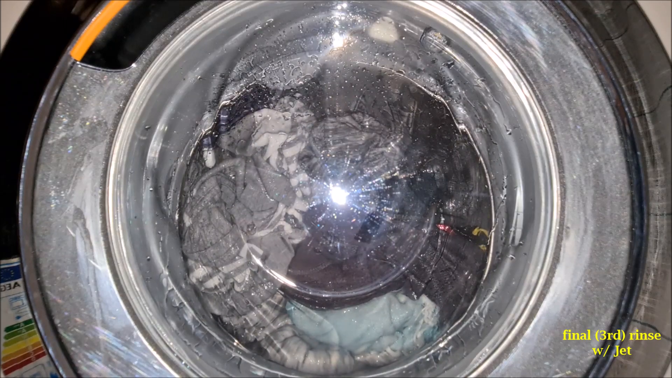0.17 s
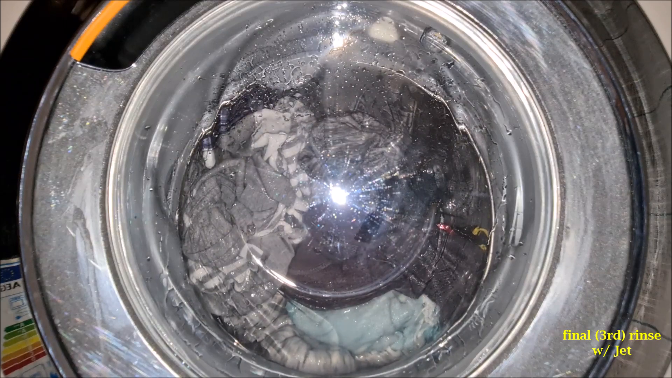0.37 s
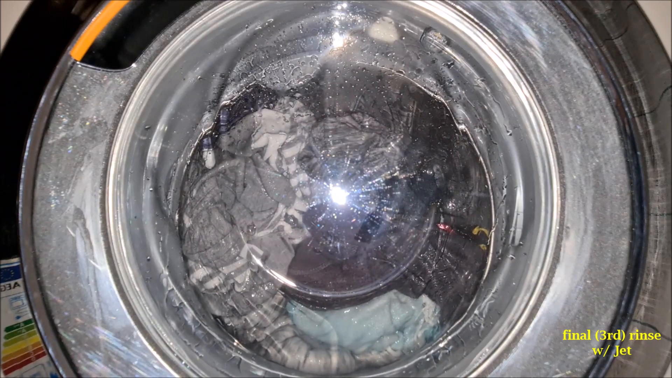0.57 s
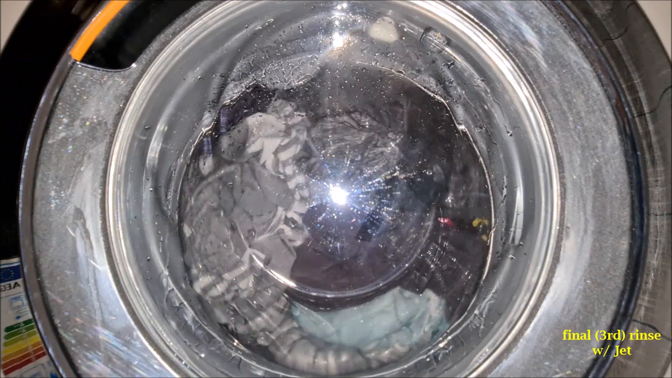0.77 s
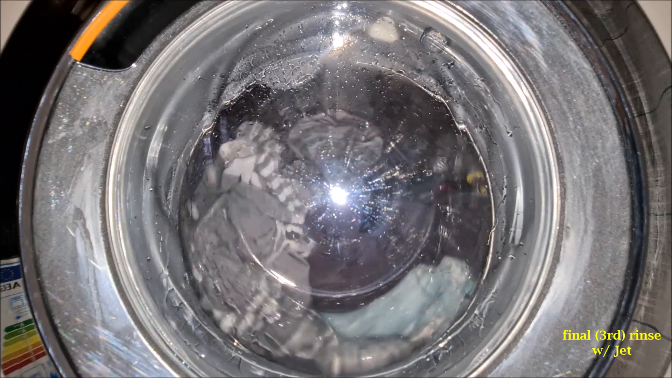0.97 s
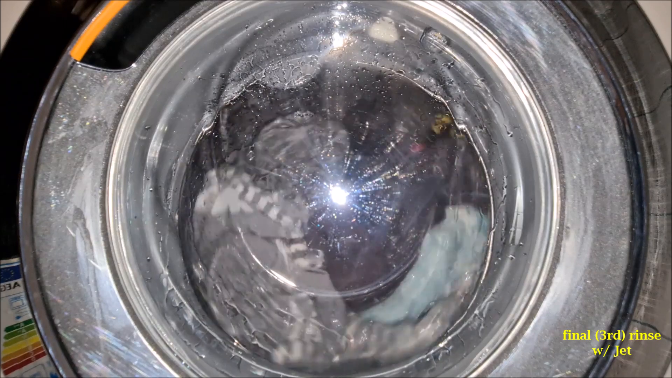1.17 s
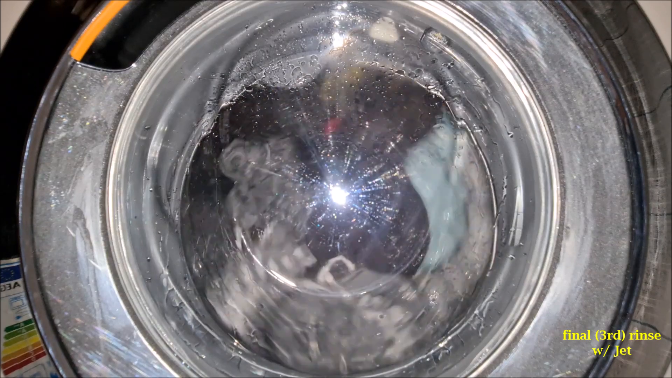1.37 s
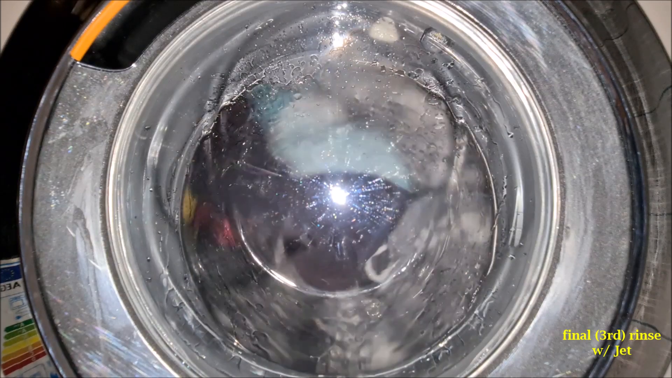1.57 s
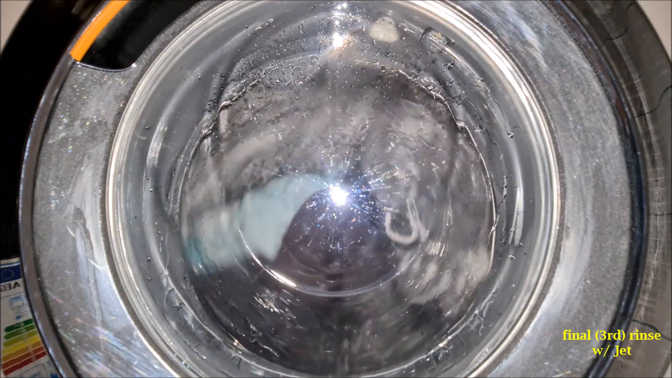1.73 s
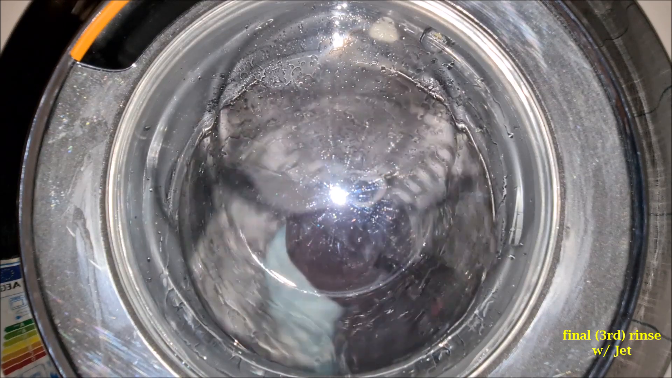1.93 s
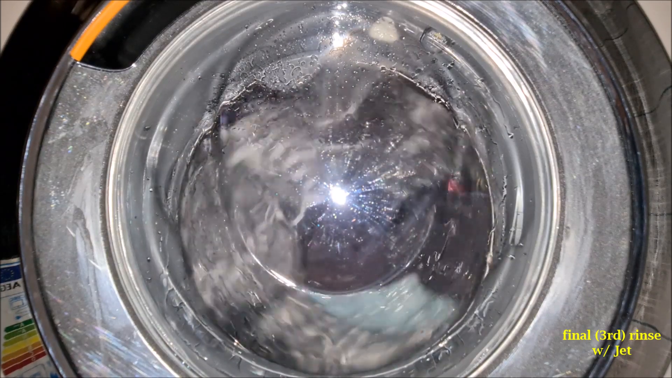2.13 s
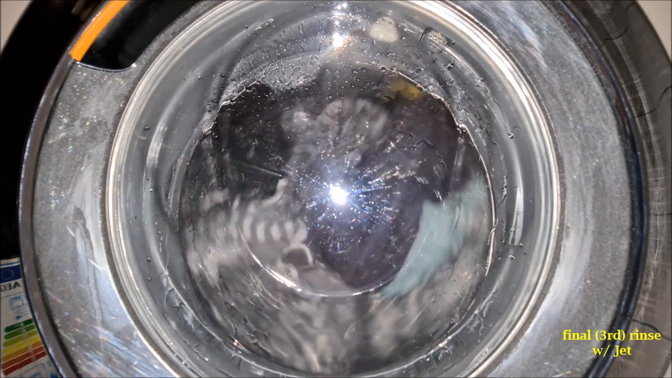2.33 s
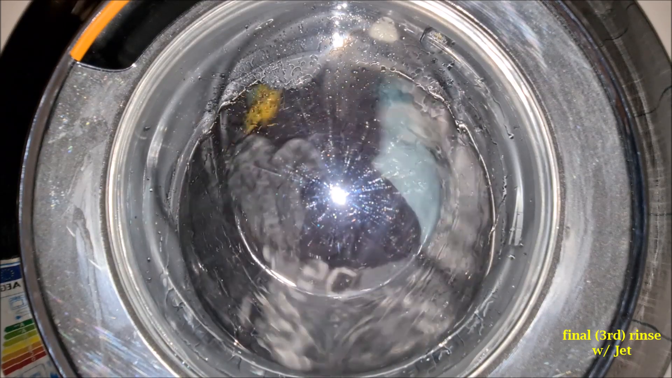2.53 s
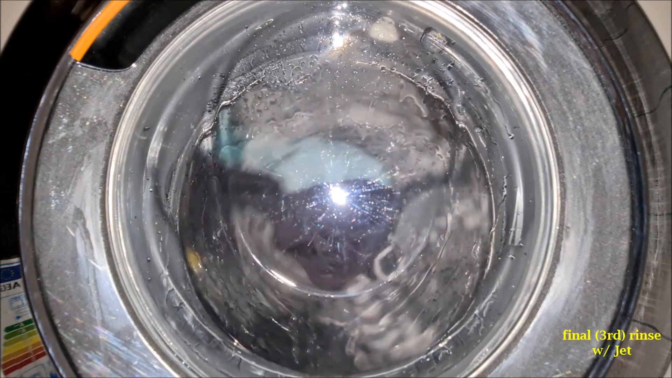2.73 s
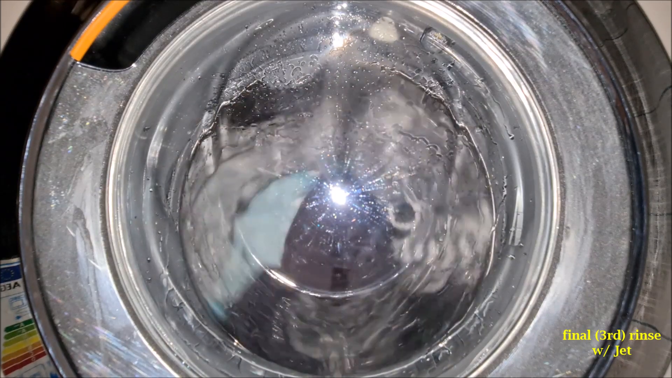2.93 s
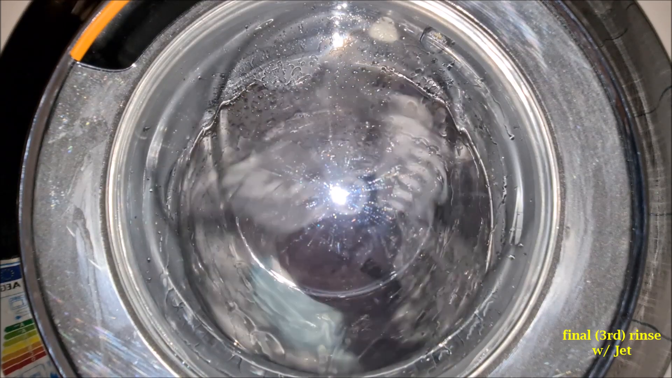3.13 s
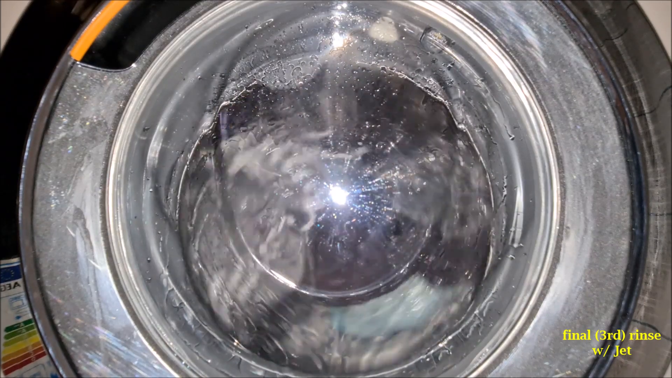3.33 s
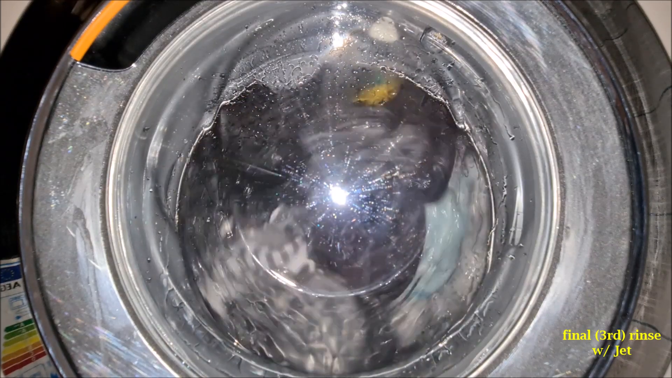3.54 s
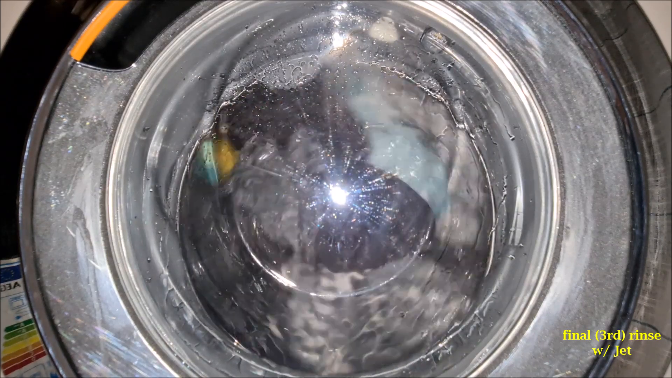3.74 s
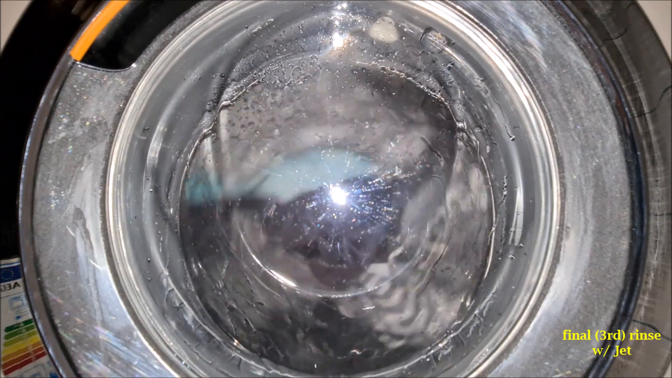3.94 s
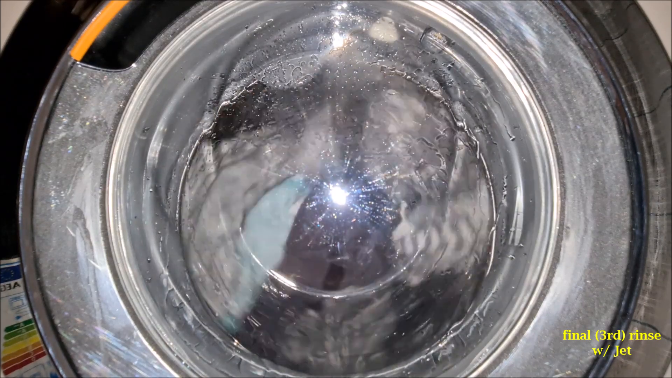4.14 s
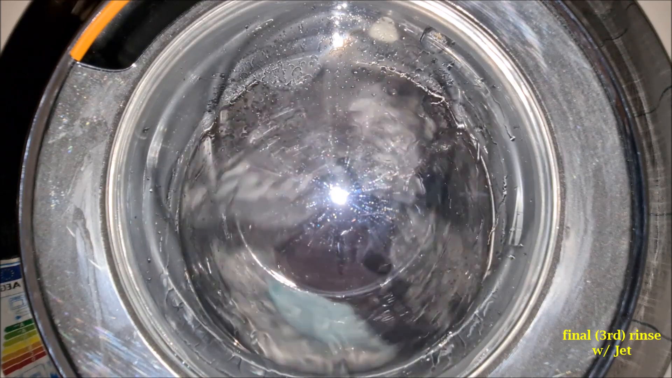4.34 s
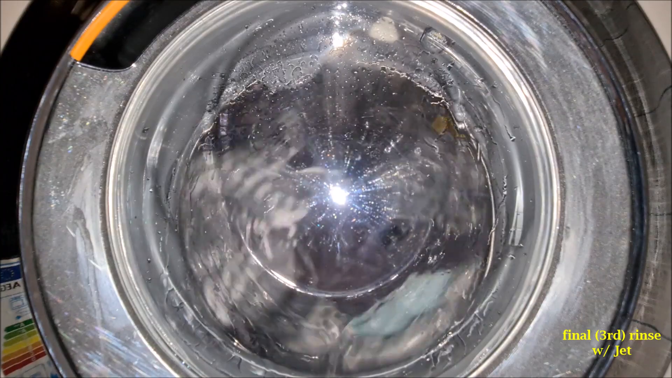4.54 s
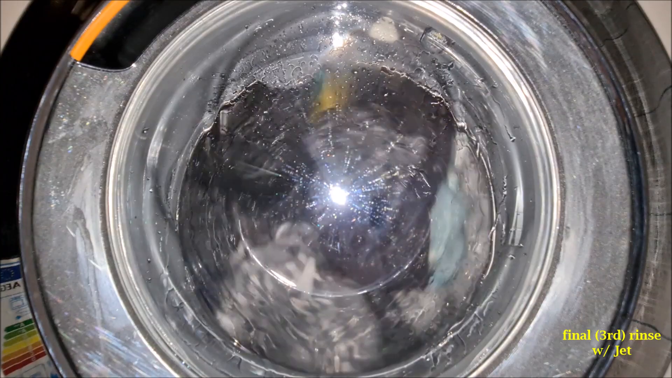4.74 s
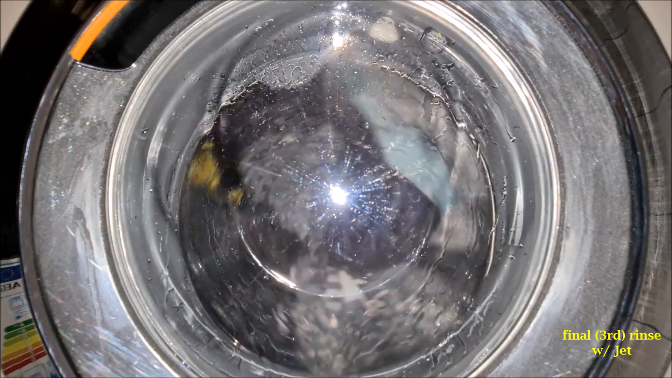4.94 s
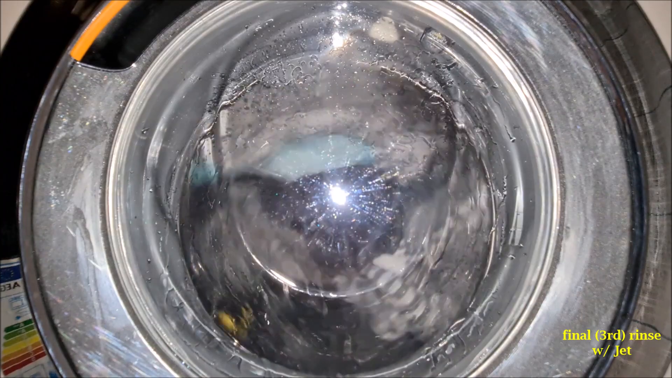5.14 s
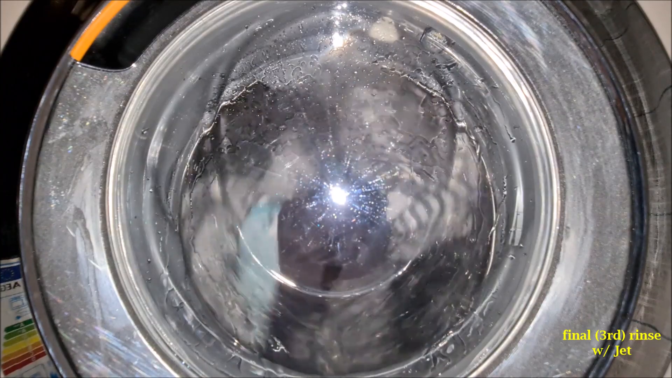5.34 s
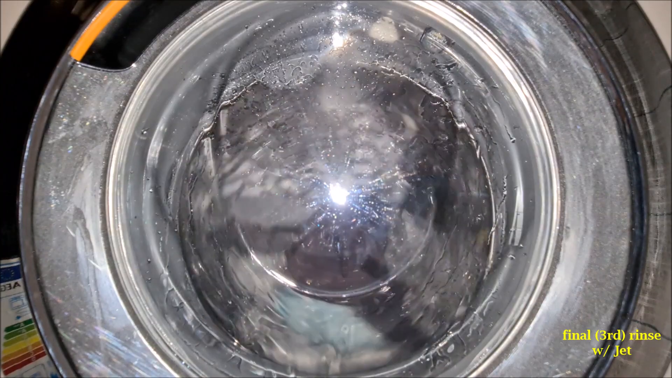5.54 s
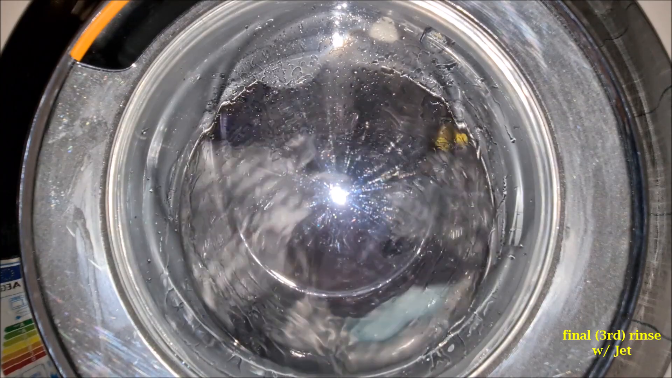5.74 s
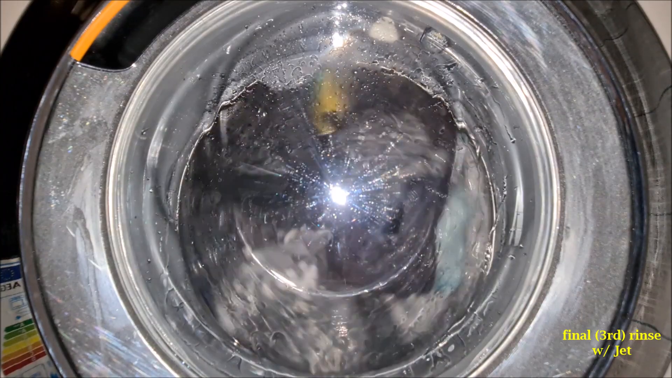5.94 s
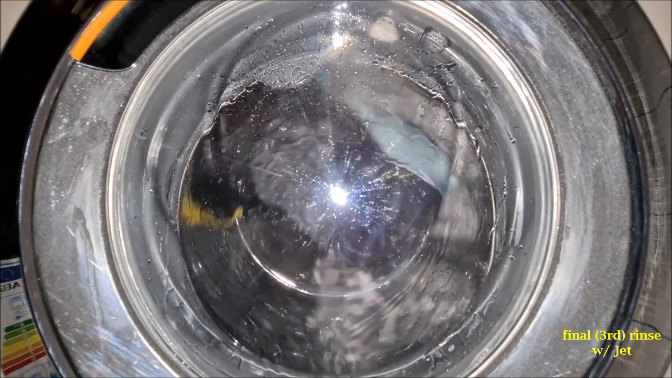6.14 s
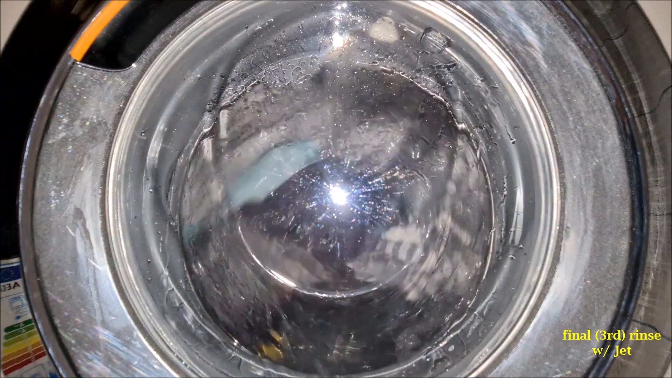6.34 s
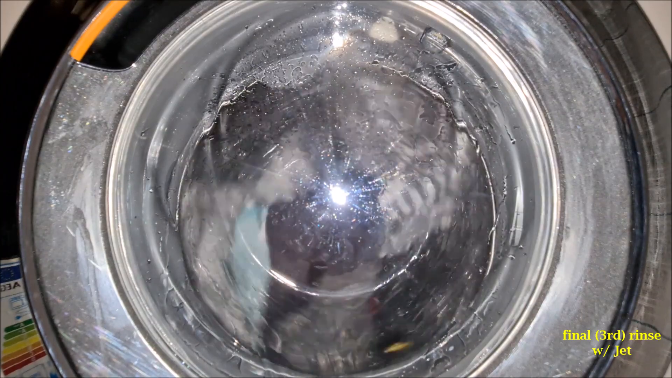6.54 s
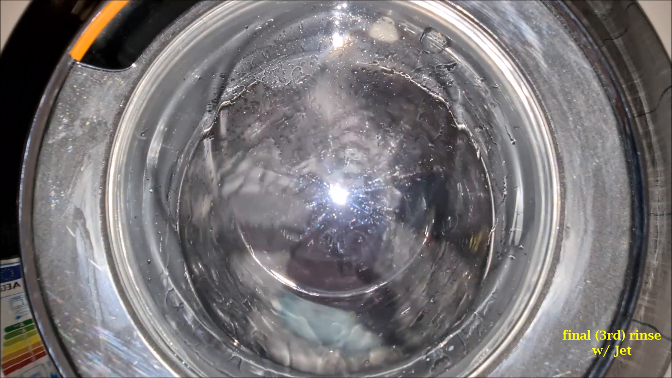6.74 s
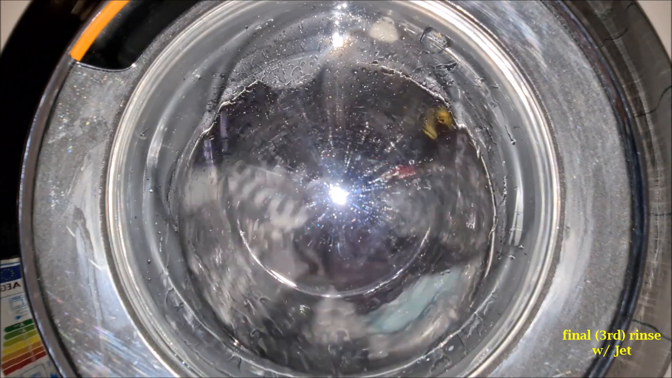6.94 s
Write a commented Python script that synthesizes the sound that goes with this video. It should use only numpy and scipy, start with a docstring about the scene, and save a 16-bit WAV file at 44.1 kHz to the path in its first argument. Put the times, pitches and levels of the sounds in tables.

```python
"""Washing machine, close to its door

A mains-driven pump hums and whistles over a steady hiss; the drum starts after about a second.
Shaped noise makes the thud and boom of the wet load and the surging slosh, spray and mist.
Drops and splashes ring resonators, the modes of the steel drum; splashes add bursts of noise.
Decaying sines make the low tones of the landings (steady pitch) and the gulps of air (rising pitch)."""
import sys
import numpy as np
from scipy import signal
from scipy.io import wavfile
from scipy.ndimage import uniform_filter1d

SR = 44100
rng = np.random.default_rng(int(sys.argv[2]) if len(sys.argv) > 2 else 0)


def wrap_up_sound(samples):
    """Save the sound to the file named by the first command line argument, as 16-bit audio."""
    columns = np.atleast_2d(samples).T
    # keep every value between -1 and 1, then stretch to whole-number steps
    tamed = np.clip(columns, -1, 1)
    steps = np.round(tamed * 32767).astype(np.int16)
    wavfile.write(sys.argv[1], SR, steps)


N = 308700
T = np.arange(N) / SR

# Noise spectra of the tumbling load: (frequency [Hz], relative level per Hz [dB])
THUD_SPECTRUM = [(25, -35), (40, -15), (52, -2.5), (72, 16), (90, -17), (115, -13)]
BOOM_SPECTRUM = [(95, -34), (130, -7.5), (160, -0.5), (185, -22.5), (215, 0.5), (250, -3), (280, -23),
                 (320, -22)]
SLOSH_SPECTRUM = [(240, -37), (300, -4), (360, 0), (520, -6), (650, -6.5), (850, -11.5), (1050, -36)]
SPRAY_SPECTRUM = [(700, -33.5), (950, -1.5), (1300, -4), (1600, -12), (2000, -9.5), (2400, -33)]
MIST_SPECTRUM = [(1800, -28), (2200, -3), (3200, -7.5), (5000, -20.5), (6500, -20.5), (7500, -36),
                 (9000, -28.5), (15800, -42)]
LUMPY_DB = 1


def tumble():
    """Noises follow the load: thud and boom in the cabinet; patchy, lumpy slosh, spray and mist."""
    thud, boom, slosh, spray, mist = load_gains()
    lumps = gain_of(LUMPY_DB * wander(16.))
    cabinet = thud * noise(shape(THUD_SPECTRUM), size=4096)
    cabinet += boom * noise(shape(BOOM_SPECTRUM), size=2048)
    water = slosh * noise(shape(SLOSH_SPECTRUM), patchy_db=2.0, flicker_db=0.3)
    water += spray * noise(shape(SPRAY_SPECTRUM), patchy_db=1.5, flicker_db=2.0, size=512)
    water += mist * noise(shape(MIST_SPECTRUM), patchy_db=3.0, flicker_db=1.5, size=512)
    return cabinet + lumps * water


# Each lifter in turn drags water up and drops it; rise and fall are Gaussian sigmas:
# (crest time [s], surge [dB], brightness [dB], rise [s], fall [s])
SURGES = [(1.32, 3, 15, .03, 0.012), (1.46, 3.5, 6, 0.021, 0.013), (1.66, 2.5, 2.5, 0.045, .1),
          (2.04, 5, 0.5, 0.074, 0.22), (2.46, 7.5, -5, 0.045, 0.18), (2.89, 2.5, -.3, 0.032, 0.092),
          (3.24, 3.5, 0, 0.19, 0.13), (3.6, 3, 1, .06, .06), (3.78, 4.5, -2.2, 0.074, 0.061),
          (4.07, 12, -0.5, 0.029, 0.049), (4.22, 4.5, -3.5, 0.036, 0.11), (4.48, 7.5, -.3, .025, 0.073),
          (4.87, 10, -1.3, 0.018, 0.085), (5.18, 4.5, .3, 0.075, 0.22), (5.47, 3, -2, 0.068, 0.025),
          (5.73, 6.5, 0.5, 0.068, 0.073), (6.009, 6.5, 2, 0.037, 0.041), (6.09, 8.5, -1.2, 0.021, 0.11),
          (6.32, 3, 0, 0.027, 0.088), (6.55, 4, 1, 0.058, 0.26), (6.91, 5, .3, 0.06, 0.26)]
SPIN_UP_S, SPRAY_START_S, FADE_S = 1.232, 1.342, 0.17  # drum and slosh start, then spray and mist
# levels with the drum turning, before landings and surges
THUD_DB, BOOM_DB, SLOSH_DB, SPRAY_DB, MIST_DB = -49.5, -52, -52.5, -60.5, -68
SLOSH_BRIGHT_SHARE, MIST_BRIGHT_SHARE = 0.13, 1
BOOM_LAG_S, BOOM_SIGMA_S, THUD_SHARE = 0.014, 0.057, 0.74


def load_gains():
    """Landings swell thud and boom; surges swell slosh, spray and mist."""
    landing_s, _, _, boom_db = np.transpose(THUMPS)
    landing_db = bells(landing_s + BOOM_LAG_S, BOOM_SIGMA_S, BOOM_SIGMA_S, boom_db)
    crest_s, surge_db, bright_db, rise_s, fall_s = np.transpose(SURGES)
    surge_db = bells(crest_s, rise_s, fall_s, surge_db)
    bright_db = bells(crest_s, rise_s, fall_s, bright_db)
    turning = np.clip((T - SPIN_UP_S) / FADE_S, 0, 1)
    spraying = np.clip((T - SPRAY_START_S) / FADE_S, 0, 1)
    return [turning * gain_of(THUD_DB + THUD_SHARE * landing_db),
            turning * gain_of(BOOM_DB + landing_db),
            turning * gain_of(SLOSH_DB + surge_db + SLOSH_BRIGHT_SHARE * bright_db),
            spraying * gain_of(SPRAY_DB + surge_db),
            spraying * gain_of(MIST_DB + surge_db + MIST_BRIGHT_SHARE * bright_db)]


def bells(centres_s, rises_s, falls_s, heights):
    """Sum of bell-shaped swells in time, each with its own rise and fall."""
    since_s = T[::64, None] - centres_s
    sigma_s = np.where(since_s < 0, rises_s, falls_s)
    return np.interp(T, T[::64], np.exp(-.5 * (since_s / sigma_s) ** 2) @ heights)


# Wet load landing on the drum floor:
# (time [s], tone level [dB], tone pitch [Hz], cabinet boom above steady [dB])
THUMPS = [(1.518, -41, 90, 1.5), (1.721, -37, 49.4, 4), (2.04, -51, 89, 7), (2.452, -46, 69, 5),
          (3.149, -36, 75, 6), (3.929, -40, 60.6, 0), (4.059, -35, 90.6, 6.5), (4.339, -49, 69, 3.5),
          (4.619, -37, 66.5, 10.5), (4.755, -31.5, 65, 9), (5.06, -45, 70, 7.5), (5.205, -33, 82.6, 11.5),
          (5.53, -42, 70, 2.5), (5.778, -31, 63, 0.5), (5.89, -42, 72, 10), (6.18, -47, 70, 3.5),
          (6.371, -24.5, 67.5, 10), (6.899, -31.5, 57, -4)]
THUMP_T60_S = 0.33


def thumps():
    """The tub rings with a low decaying tone, 49 to 91 Hz, after each landing."""
    t, out = np.arange(SR // 2) / SR, np.zeros(N)
    for s, db, hz, _ in THUMPS:
        swell = (1 - np.exp(-t / 0.012)) ** 2 * gain_of(db - 60 * t / THUMP_T60_S)
        add(out, s, swell * np.sin(2 * np.pi * hz * t))
    return sided(65)[:, None] * out


# Steel drum modes:
# (frequency [Hz], width [Hz], relative level under drops [dB], mean left-ear phase lead [rad])
DRUM_MODES = [(507.4, 14, 1, 1.5), (612, 18, -8, -0.5), (1073, 105, -7, 1.1), (1158, 57, -1.5, 1),
              (1448, 46, 1.5, -2.5), (1740, 62, -6.5, 4), (1820, 90, -10.5, -1), (2068, 49, -12, 2.5),
              (2444, 62, -17, -1.5), (2702, 41, -13, -2.65), (3226, 38, -14.5, -2.5), (3885, 59, -23.5, 4),
              (4160, 70, -22.5, 3), (4530, 79, -21.5, 2.5), (5030, 170, -24, -4.5)]
DROPS_PER_S, DROP_SPREAD_DB = 110., 3.5  # on each mode
RING_T60_S = 0.068


def drum():
    """Random drops and the splashes ring the steel modes; a splash favours modes near its two pitches."""
    slosh, spray, mist = load_gains()[2:]
    swells, out = blows(0.0034, RING_T60_S), np.zeros((2, N))
    for hz, width_hz, db, lead in DRUM_MODES:
        chance, size, rush = rng.random(N), rng.exponential(1, N), rng.standard_normal(N)
        drop_gain = gain_of(DROP_SPREAD_DB * np.minimum(size, 3))
        drops = evened((chance < DROPS_PER_S / SR) * np.sign(rush) * drop_gain)
        # each mode is wetted by the water of its own range
        if hz < 900:
            wet = slosh * gain_of(-10.0)
        elif hz < 2200:
            wet = spray * gain_of(-5.5)
        else:
            wet = mist * gain_of(3.0)
        splash = np.zeros(N)
        for (s, swell), (_, low_db, low_hz, high_db, high_hz, _) in zip(swells, SPLASHES):
            near_low = gain_of(low_db - 145 * np.log2(hz / low_hz) ** 2)
            near_high = gain_of(high_db - 150 * np.log2(hz / high_hz) ** 2)
            add(splash, s, swell * (near_low + near_high))
        # a splash pushes partly in step with the mode, partly at random
        push = 0.028 * np.exp(2j * np.pi * (hz * T + rng.random())) + 0.58 * rush
        sound = ring(gain_of(db) * wet * drops + splash * push, hz, width_hz)
        for _ in range(2):  # water is soft: no click far from the mode
            sound = 0.13 * ring(sound, hz, 728.0)
        # the turning drum shifts each mode between the ears
        turn = np.exp(.5j * (lead + 1.07 * min(hz / 1200, 1) * wander(4.)))
        out += sided(hz)[:, None] * np.array([sound * turn, sound * turn.conj()]).real
    return out


def ring(drive, hz, width_hz):
    """Complex resonance whose real part has rms 1 for white noise of rms 1."""
    r = np.exp(-np.pi * width_hz / SR)
    return signal.lfilter([np.sqrt(2 - 2 * r ** 2)], [1, -r * np.exp(2j * np.pi * hz / SR)], drive)


# Water slapping glass and steel; levels relative: (time [s], low ring level [dB], low ring pitch [Hz],
# high ring level [dB], high ring pitch [Hz], treble level [dB])
SPLASHES = [(1.304, -51.5, 1210, -67, 2500, -92), (1.4387, -47, 1230, -46.5, 3000, -57),
            (1.539, -57, 1470, -55.5, 2810, -79), (1.5644, -50, 1160, -55.5, 2920, -77),
            (1.595, -46, 1800, -61, 2710, -76), (1.667, -37, 1250, -54, 2430, -62),
            (1.7848, -42, 1200, -72, 2220, -76), (1.9114, -41, 1190, -50.5, 2430, -73),
            (2.0494, -61, 964, -49.5, 2300, -70), (2.0884, -54, 1140, -61, 2390, -73),
            (2.3426, -46, 1780, -71, 2490, -76), (2.372, -56, 1140, -54, 3270, -57.5),
            (2.4423, -45, 1170, -58, 2420, -72), (2.717, -46, 956, -54, 2180, -70),
            (2.8544, -49, 1110, -57, 2710, -74), (3.05, -47, 1800, -57.5, 2300, -77),
            (3.1612, -50, 1050, -54, 2240, -73), (3.234, -48, 1210, -50.5, 2440, -72.5),
            (3.31, -40, 1470, -53, 2720, -76), (3.51, -43, 1160, -54.5, 3900, -80),
            (3.57, -40.5, 1470, -54, 3200, -68), (3.7244, -36, 1250, -73, 2260, -80),
            (3.785, -36.5, 1640, -57, 2110, -64), (4.0523, -41, 1130, -43.5, 2340, -55),
            (4.0794, -42.5, 1130, -57, 2490, -76), (4.3444, -47.5, 1180, -72, 2360, -76),
            (4.386, -40.5, 1420, -58, 2670, -66), (4.4722, -40, 1220, -65, 2870, -81),
            (4.8569, -45, 1180, -56, 2400, -74), (4.9204, -41, 1430, -50.5, 2300, -72),
            (5.166, -47, 1090, -48, 3680, -57), (5.2026, -46, 1720, -55, 2910, -70),
            (5.323, -55, 1090, -59, 2470, -74), (5.4724, -57, 1150, -53, 3170, -76),
            (5.6136, -48, 1150, -49.5, 2710, -67), (5.7515, -42, 1100, -70, 2190, -81),
            (5.9896, -51, 1350, -48, 3220, -64), (6.058, -41, 1840, -51, 2750, -67),
            (6.178, -51, 1440, -60, 2400, -71), (6.206, -43, 1160, -39.5, 3000, -55),
            (6.33, -40, 1650, -44.5, 3300, -60), (6.4552, -53, 1130, -74, 2110, -64),
            (6.51, -39, 990, -61, 2150, -76), (6.55, -40, 1120, -70, 2410, -82),
            (6.6723, -49, 1710, -56, 2230, -69), (6.8345, -55, 1080, -53, 3240, -69),
            (6.888, -38.5, 1140, -63, 2480, -74)]
# Noise spectra of a splash: (frequency [Hz], relative level per Hz [dB])
SLAP_SPECTRUM = [(600, -23), (1100, -16), (2500, 3), (4000, 4), (5000, -14.5), (6500, -35)]
FIZZ_SPECTRUM = [(3500, -14), (4500, 6.5), (6500, -1), (7500, -3.5), (9000, -5), (12000, -14), (15800, -15)]
CRUNCH_T60_S, SLAP_T60_S, FIZZ_T60_S = .14, .15, 0.11
CRUNCH_DB = -9.  # re low ring level


def splashes():
    """Each splash bursts into wide noise: a wet crunch, a slap and a treble fizz."""
    crunch, slap, fizz = np.zeros((3, N))
    crunches, slaps = blows(0.0074, CRUNCH_T60_S), blows(0.0014, SLAP_T60_S)
    fizzes = blows(0.0026, FIZZ_T60_S)
    for i, (s, low_db, _, high_db, _, treble_db) in enumerate(SPLASHES):
        add(crunch, s, crunches[i][1] * gain_of(low_db + CRUNCH_DB))
        add(slap, s, slaps[i][1] * gain_of(high_db - 6.5))
        add(fizz, s, fizzes[i][1] * gain_of(treble_db + 0.5))
    return (crunch * noise(shape(SPRAY_SPECTRUM), size=256)
            + slap * noise(shape(SLAP_SPECTRUM), patchy_db=2.5, size=256)
            + fizz * noise(shape(FIZZ_SPECTRUM), patchy_db=5.0, size=256))


def blows(rise_s, t60_s):
    """Start time and swell of every splash: exponential rise and decay."""
    t = np.arange(6000) / SR
    swell = (1 - np.exp(-t / rise_s)) * gain_of(-60 * t / t60_s)
    return [(s, swell) for s, *_ in SPLASHES]


# Air pockets gulping: (time [s], relative level [dB], nominal pitch [Hz])
GULPS = [(1.405, -30, 357), (1.759, -39, 245), (1.962, -41, 330), (2.211, -28.5, 485), (2.443, -36.5, 532),
         (2.506, -51, 456), (2.565, -37, 336), (2.649, -37, 394), (3.153, -30, 254), (3.362, -29.5, 347),
         (3.429, -35.5, 495), (4.066, -29.5, 215), (4.864, -36, 369), (4.979, -31.5, 347),
         (5.129, -36, 400), (5.313, -28.5, 230), (5.661, -34.5, 486), (5.787, -33.5, 243),
         (6.197, -30, 356), (6.545, -36, 588), (6.735, -39, 369), (6.887, -36, 482)]


def gulps():
    """Each air pocket rings briefly while its pitch rises."""
    t, out = np.arange(3000) / SR, np.zeros(N)
    for s, db, hz in GULPS:
        swell = (1 - np.exp(-t / 0.0027)) * gain_of(db - 1.5 - 60 * t / 0.11)
        cycles = hz * (.95 * t + 2.33 * t ** 2)  # starts 5 % below nominal
        add(out, s, swell * np.sin(2 * np.pi * cycles))
    return sided(400)[:, None] * out


MAINS_HZ = 50.0
# Pump hum: (multiple of the mains [1], rms level before wavering [dB], wavering [dB])
HUM = [(1, -53, -2.5), (2, -46.5, 2.27), (3, -64.5, -2), (4, -58.5, 3), (5, -65.5, 4), (6, -67, 3),
       (7, -65, 3.2), (11, -73, -0.5), (16, -78, 7), (17, -75, 2.5)]
# Pump whistles: (frequency [Hz], half-gain width [Hz], relative level [dB])
WHINE = [(620, 12, 1.5), (2248, 22, -13.5), (2493, 95, -14.5), (3110, 44, -21.5)]
WHINE_DB = -71


def pump():
    """Mains multiples that waver, and fuzzy whistles."""
    hum = np.zeros((2, N))
    for k, db, waver_db in HUM:
        level = np.sqrt(2) * gain_of(db + waver_db * wander(6.))
        tone = np.sin(2 * np.pi * (k * MAINS_HZ * T + rng.random()))
        hum += sided(k * MAINS_HZ)[:, None] * level * tone
    return hum + gain_of(WHINE_DB) * noise(lambda hz: peaks(WHINE, hz), patchy_db=0.5, size=2048)


def peaks(modes, hz):
    """Summed gain of steep resonances."""
    return sum(gain_of(db) / (1 + (2 * (hz - f) / w) ** 2) for f, w, db in modes)


# Steady background hiss, with a broad dip near 7.4 kHz: (frequency [Hz], relative level per Hz [dB])
HISS_SPECTRUM = [(12, -40), (20, -8.5), (107, -10.5), (149, -13), (253, -19), (353, -14.5), (690, -32),
                 (816, -28), (1050, -37), (2490, -44), (2860, -48), (6080, -52), (7390, -65), (8730, -57.5),
                 (15700, -63.5)]
HISS_DB = -50.5


def background_hiss():
    """Steady, slightly patchy noise, strongest in the bass."""
    return gain_of(HISS_DB) * noise(shape(HISS_SPECTRUM), patchy_db=2.0, size=2048)


# Left-right coherence of noise: (frequency [Hz], likeness [0..1])
LIKENESS = [(60, 0.95), (130, 1), (290, 0.91), (520, 0.5), (750, 0.075), (1400, 0.17), (3100, 0.094),
            (6800, 0.044), (15000, 0.24)]


def noise(colour, patchy_db=0., flicker_db=0., size=1024):
    """Stereo noise of rms 1; patches drift in time and pitch, flicker is shared by all pitches."""
    hop = size // 4
    frames, hz = N // hop + 5, np.fft.rfftfreq(size, 1 / SR)
    a, b, c, d, patches = rng.standard_normal((frames, len(hz), 5)).T
    patches = uniform_filter1d(patches, size=size // 80, axis=0)
    patches = evened(uniform_filter1d(patches, size=1 + 1600 // hop, axis=1))
    flicker = evened(uniform_filter1d(rng.standard_normal(frames), size=1 + 1000 // hop))
    same = np.clip(read(LIKENESS, hz), -1, 1)[:, None]
    left = a + 1j * b
    right = same * left + np.sqrt(1 - same ** 2) * (c + 1j * d)
    z = np.array([left, right]) * (sided(hz) * colour(hz))[..., None]
    z *= gain_of(patchy_db * patches + flicker_db * flicker)
    return evened(signal.istft(z, nperseg=size, noverlap=size - hop)[1][:, :N])


def shape(points):
    """A colour from a spectrum table, silent outside it."""
    return lambda hz: gain_of(read(points, hz)) * (hz >= points[0][0]) * (hz <= points[-1][0])


# Stereo balance: (frequency [Hz], left minus right [dB])
LEAN = [(60, -4.5), (130, -1.5), (290, -2.0), (640, -1), (1410, 0.5), (3100, -2), (6820, -1.5),
        (15000, 1.5)]


def sided(hz):
    """Left and right gains of a source of this pitch."""
    return gain_of(np.multiply.outer([.5, -.5], read(LEAN, hz)))


def read(points, hz):
    """Reads a spectrum table on a log-frequency axis."""
    f, value = np.transpose(points)
    return np.interp(np.log(hz + 1), np.log(f + 1), value)


def wander(top_hz):
    """Slow chance of rms 1: sines of random phase up to top_hz."""
    t = T[::64]
    slow = np.zeros(len(t))
    for f in np.geomspace(top_hz / 20, top_hz, 20):
        slow += np.sin(2 * np.pi * (f * t + rng.random())) / np.sqrt(f)
    return np.interp(T, t, evened(slow))


def gain_of(db):
    """Decibels to gain."""
    return 10 ** (np.asarray(db) / 20)


def evened(x):
    """Scales to rms 1."""
    return x / np.sqrt(np.mean(x ** 2) + 1e-20)


def add(mix, s, sound):
    """Mixes a sound in at s seconds."""
    part = mix[round(s * SR):][:len(sound)]
    part += sound[:len(part)]


def scene():
    """All sources together."""
    return tumble() + thumps() + drum() + splashes() + gulps() + pump() + background_hiss()


EDGE_HZ = 15750


def record(dry):
    """The microphone loses the deepest bass; then the band limit."""
    thin = signal.sosfilt(signal.butter(4, 36., "high", fs=SR, output="sos"), dry)
    padded = np.pad(thin, [(0, 0), (255, 255)], "reflect", reflect_type="odd")
    low_pass = signal.firwin(511, EDGE_HZ, window=("kaiser", 9), fs=SR)
    return signal.oaconvolve(padded, low_pass[None], "valid", axes=1)


dry = scene()
out = record(dry)
wrap_up_sound(out)
```